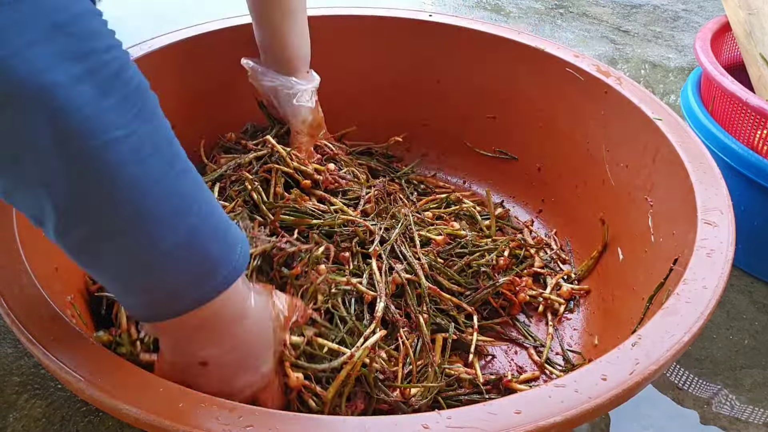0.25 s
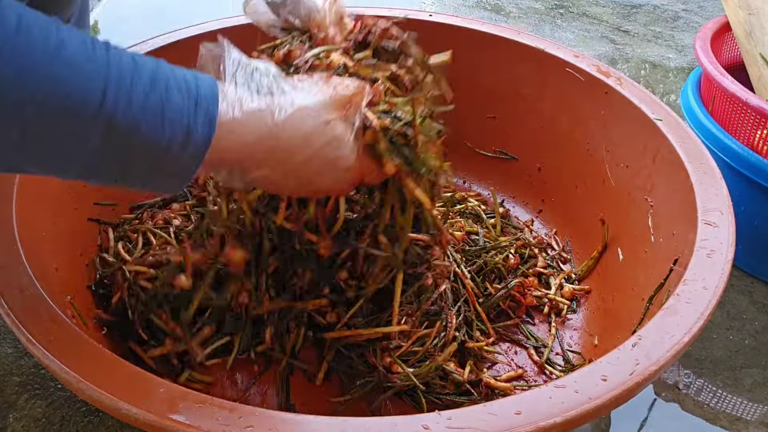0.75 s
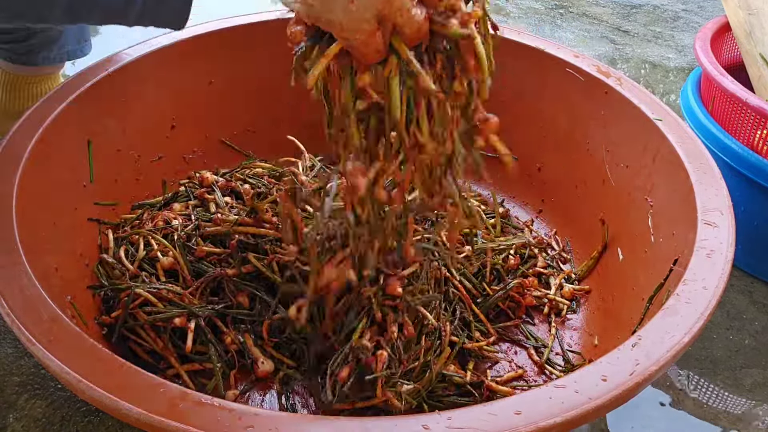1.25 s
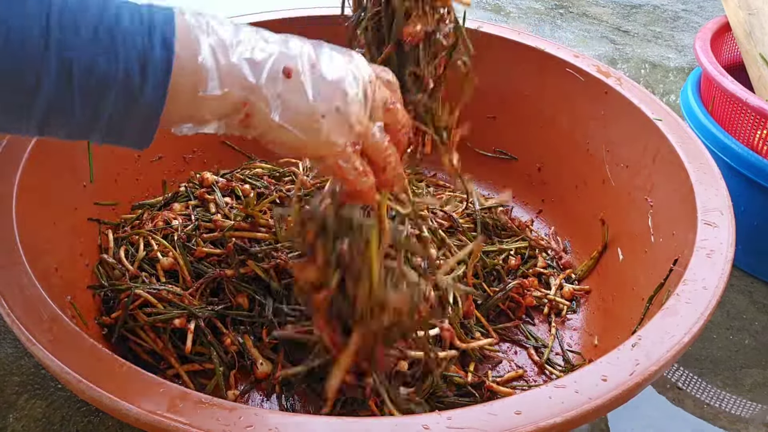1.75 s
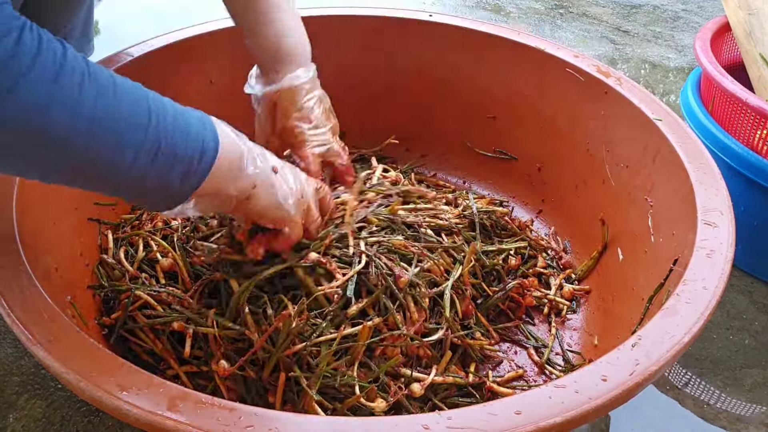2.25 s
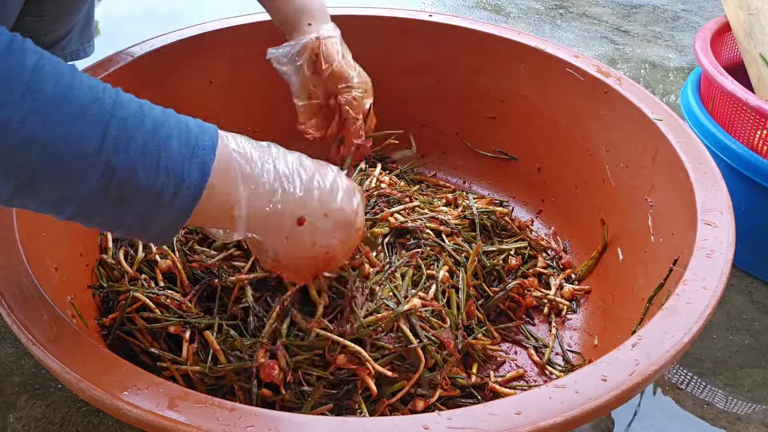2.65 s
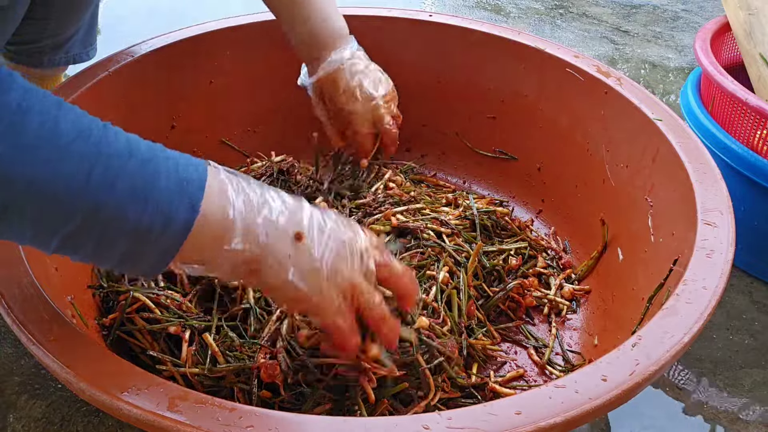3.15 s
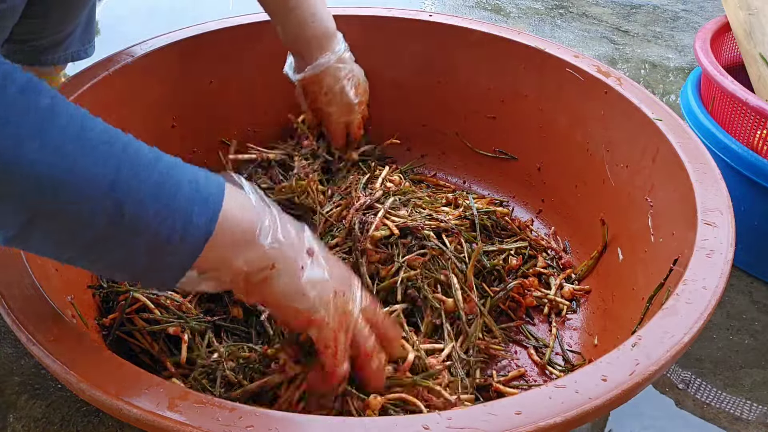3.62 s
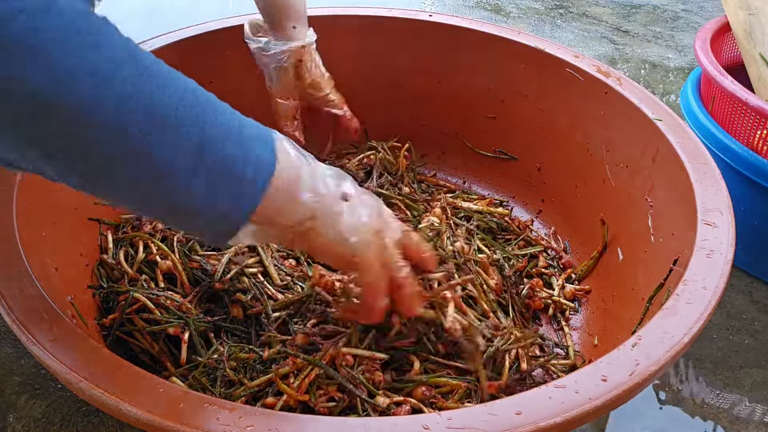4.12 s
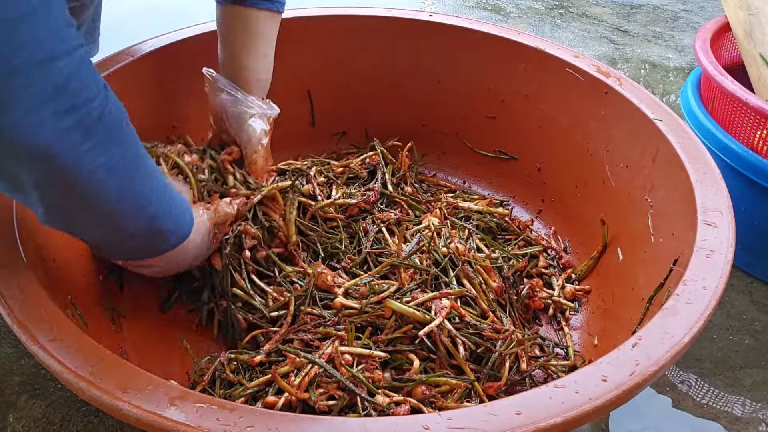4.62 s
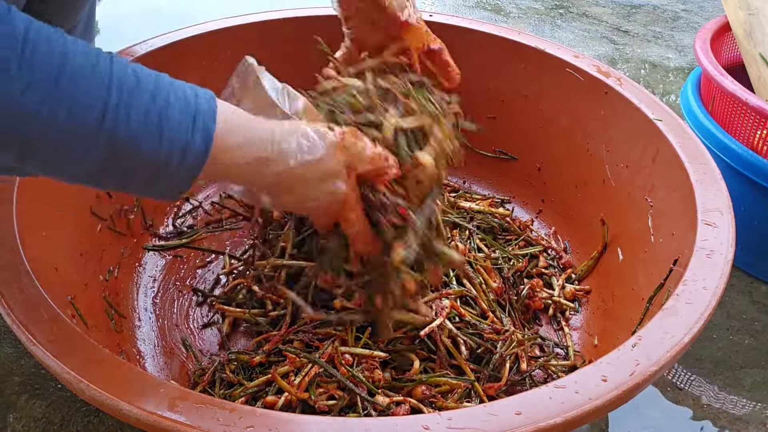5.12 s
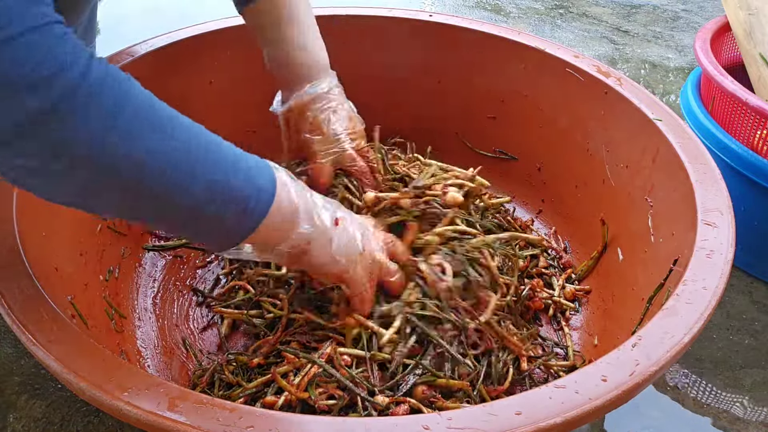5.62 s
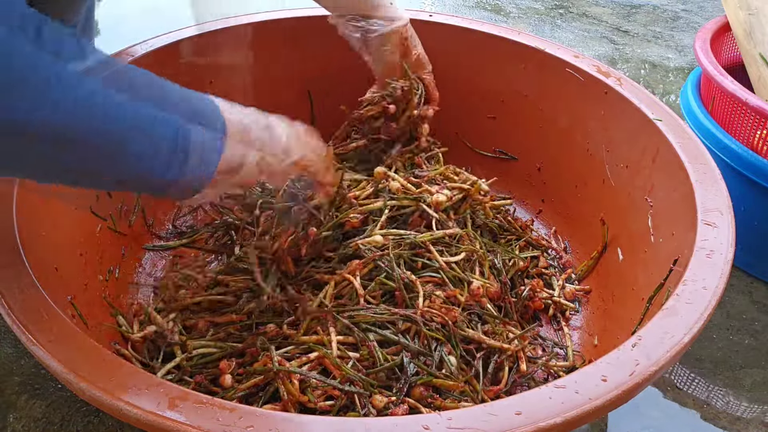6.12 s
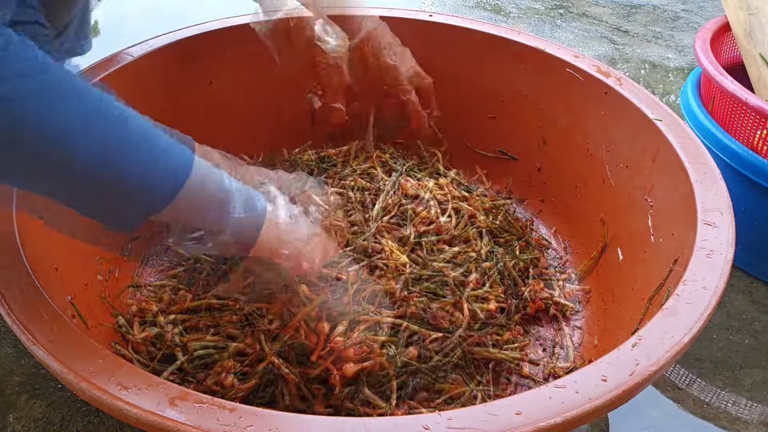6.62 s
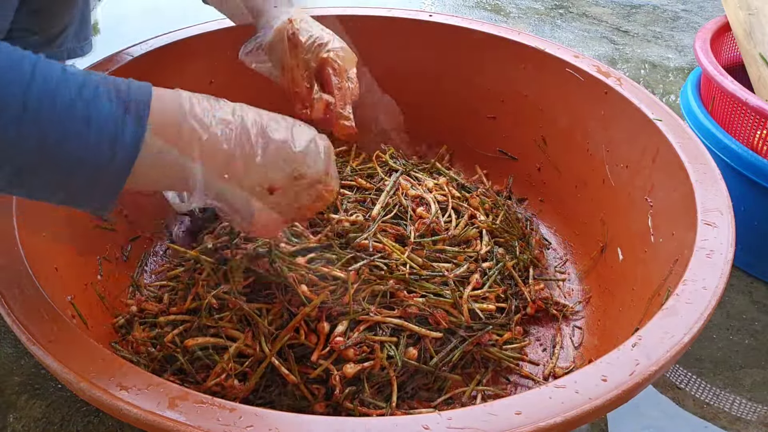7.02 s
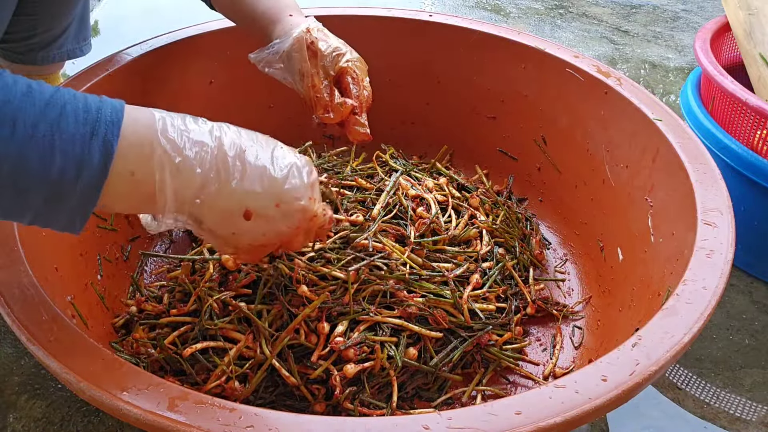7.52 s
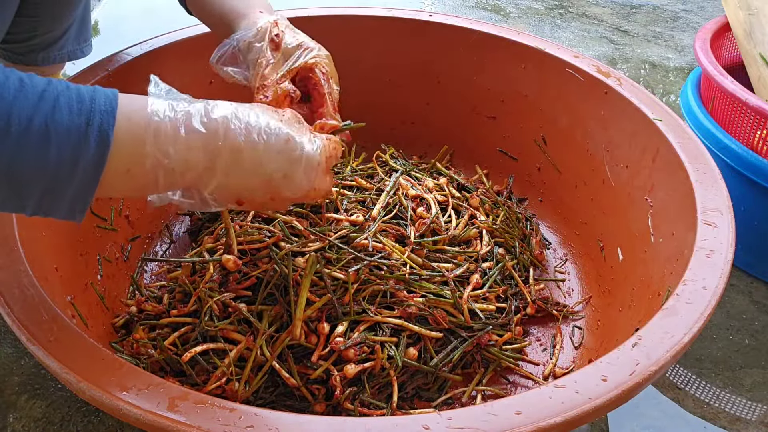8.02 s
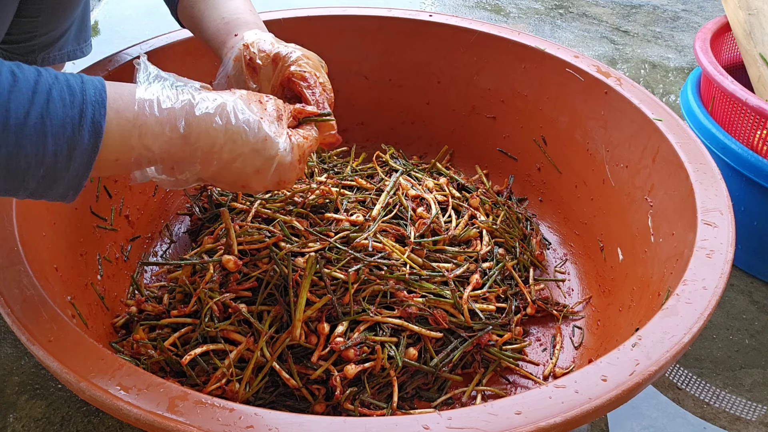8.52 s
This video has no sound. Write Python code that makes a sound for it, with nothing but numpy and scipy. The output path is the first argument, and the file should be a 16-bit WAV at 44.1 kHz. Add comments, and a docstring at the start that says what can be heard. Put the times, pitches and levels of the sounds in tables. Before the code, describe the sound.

Wet seasoned stems are tossed by gloved hands in a plastic basin, squelching and crackling, with hollow knocks while a swallow twitters nearby.

```python
"""Tossing wet stems in a yard

Close by, hands in thin plastic gloves toss wet seasoned stems: squelch and film crackle are pops over noise.
Stick-slip noise drags on a big plastic basin, which booms under heaves and knocks on the ground by its modes.
A swallow twitters nearby in gliding sines and rasping pulses, with a slap from a wall; a dove coos far off.
Behind them lie a low outdoor rumble and a faint hiss, both of shaped noise."""
import sys
import numpy as np
from scipy import signal
from scipy.fft import rfft, irfft, next_fast_len
from scipy.io import wavfile
from scipy.ndimage import map_coordinates

SR = 44100
rng = np.random.default_rng(int(sys.argv[2]) if len(sys.argv) > 2 else 0)


def waveform_to_disk(signal):
    """Save audio, clipped to [-1, 1], as 16-bit WAV at the path in sys.argv[1]."""
    frames = np.transpose(np.atleast_2d(signal))
    scaled = np.clip(frames, -1, 1) * 32767
    samples = np.round(scaled).astype(np.int16)
    wavfile.write(sys.argv[1], SR, samples)


N = 386316

TOP_HZ = 15900  # band limit of the microphones
# the swallow's rasps: t/s, upsweep level/dB, level/dB of the rattle before it
RASPS = [(0.385, -50, -53), (2.184, -53, -52), (4.366, -54, -59), (6.175, -64, -61.5), (6.795, -53, -56),
         (8.336, -50, -57)]


def amp(db):
    """Decibels to gain."""
    return 10 ** (np.asarray(db) / 20)


def unit(x):
    """x at rms 1."""
    return x / np.sqrt(np.mean(x ** 2) + 1e-20)


def crest(x):
    """x at peak 1."""
    return x / (np.abs(x).max() + 1e-20)


def along(points, hz):
    """(f/Hz, value) points read on a log frequency axis."""
    f, v = np.transpose(points)
    return np.interp(np.log(hz + 1), np.log(f + 1), v)


def curves(rows):
    """One value per sample for each column after the time."""
    s, *cols = np.transpose(rows)
    return [np.interp(np.arange(N) / SR, s, c) for c in cols]


def wobble(rate, size=N):
    """A smooth random curve, rate knots a second."""
    knots = rng.standard_normal(int(size * rate / SR) + 4)
    return map_coordinates(knots, [np.arange(size) * rate / SR])


def filtered(x, response):
    """x times a response of frequency."""
    m = next_fast_len(x.shape[-1] + SR // 4)
    spectrum = rfft(x, m) * response(np.fft.rfftfreq(m, 1 / SR))
    return irfft(spectrum, m)[..., :x.shape[-1]]


def coloured(x, spectrum):
    """x given a (f/Hz, level/dB) spectrum, at rms 1."""
    return unit(filtered(x, lambda hz: amp(along(spectrum, hz))))


def band(x, lo_hz, hi_hz):
    """A causal band-pass."""
    edges = [lo_hz, np.clip(hi_hz, lo_hz + 1, SR / 2 - 1)]
    return signal.sosfilt(signal.butter(2, edges, "band", fs=SR, output="sos"), x)


def add(track, s, sound):
    """Mix a sound into a track from time s on."""
    start = round(s * SR)
    part = sound[..., max(-start, 0):N - start]
    track[..., max(start, 0):][..., :part.shape[-1]] += part


def diffuse():
    """Stereo white noise, alike at the two microphones in the bass and unrelated at the top."""
    # left-right likeness of diffuse sound: f/Hz, likeness (0-1)
    likeness = [(60, 0.98), (250, 0.77), (900, 0.3), (2000, 0.5), (12000, 0)]

    def mid_side(hz):
        turn = np.arccos(np.clip(along(likeness, hz), -1, 1)) / 2
        return np.array([np.cos(turn), np.sin(turn)])

    mid, side = filtered(rng.standard_normal((2, N)), mid_side)
    return np.array([mid + side, mid - side])


def grains(rate, centre_hz, cycles, spread_db):
    """Tiny damped pops, rate a second, of random pitch and size, each from its own place in the basin."""
    when, pitch, size, side, lead = rng.random((int(rate * N / SR), 5)).T[:, :, None]
    hz = np.minimum(centre_hz * 2 ** (3 * (pitch - .5)), TOP_HZ)
    gain = hz / centre_hz * amp(spread_db * np.minimum(-np.log(1 - size), 3.5))
    turns = (hz * np.arange(64) / SR).astype(np.float32)
    pops = np.sin(2 * np.pi * turns) * np.exp(-turns / cycles)
    ears = []
    for sign in (1, -1):
        # place is a few samples of delay and some dB between the sides
        at = np.abs(when * N + sign * 9 * (lead - .5)).astype(int) + np.arange(turns.shape[1])
        placed = pops * (gain * amp(sign * 7.9 * (side - .5)))
        ears.append(np.bincount(at.ravel(), placed.ravel(), N)[:N])
    return unit(np.array(ears))


def yard(x):
    """The diffuse answer of walls and ground: decaying noise, different at each microphone."""
    # the yard's echo: f/Hz, t60/s
    echo_t60 = [(200, 0.35), (1000, 0.19), (5000, 0.23), (14000, 0.071)]
    hz, t, z = signal.stft(rng.standard_normal((2, SR // 2)), SR, nperseg=256)
    decay = amp(-60 * t / along(echo_t60, hz)[:, None])
    tail = signal.istft(z * decay, SR, nperseg=256)[1]
    return signal.fftconvolve(np.atleast_2d(x), tail / np.linalg.norm(tail[0]), axes=1)[:, :N]


def outdoors():
    """Low, slowly swaying distant rumble under a faint even hiss, both from one diffuse noise."""
    # distant rumble: t/s, level/dB
    rumble_level = [(0.0, -51), (3.0, -52.5), (7.3, -50.8), (7.5, -54)]
    # spectrum of the rumble: f/Hz, level/dB per Hz
    low_spectrum = [(20, -18), (35, -10), (50, -8.5), (65, 2.5), (85, -1), (115, -3.5), (145, -5),
                    (175, -11), (220, -11), (280, -21), (380, -23.5), (470, -26.5), (540, -43), (900, -53)]
    # spectrum of the hiss: f/Hz, level/dB per Hz
    air_spectrum = [(290, -34), (500, -7), (760, 10), (1160, -9), (1350, -6), (2710, -12.5), (3670, 0.5),
                    (7450, -4), (9950, -10), (11700, -8), (15800, -14)]
    rumble_db, = curves(rumble_level)
    noise = diffuse()
    rumble = amp(rumble_db + 1.5 * wobble(7)) * coloured(noise, low_spectrum)
    return rumble + amp(-74.5) * coloured(noise, air_spectrum)


def dove():
    """Far-off coos: sines that sag and sway in pitch, with the yard's echo."""
    # coos: t/s, length/s, f/Hz, level/dB before a small lift
    coos = [(0.519, 0.32, 417, -70), (1.021, 0.47, 397, -66.5), (1.84, 0.26, 398, -65.5),
            (2.185, 0.26, 398, -67), (2.9, 0.3, 408, -67), (3.329, 0.48, 393, -63),
            (4.205, 0.15, 396, -62.5), (5.227, .3, 421, -67.5), (5.729, 0.52, 385.7, -63.5),
            (6.552, 0.247, 390.5, -64.5), (6.902, 0.16, 387.7, -69)]
    out = np.zeros(N)
    sway = wobble(22)
    for s, length, hz, db in coos:
        u = np.linspace(0, 1, int(length * SR))
        pitch = hz * (1 - 0.023 * (u - .5) + 0.0075 * sway[int(s * SR):][:len(u)])
        swell = np.sqrt(np.abs(np.sin(np.pi * u)))
        add(out, s, amp(db + 1.5) * swell * np.sin(2 * np.pi * np.cumsum(pitch) / SR))
    return out + amp(-12.5) * yard(out)


def syllable(shape, waver):
    """Phase and loudness of one syllable; each has its own pitch and flutter."""
    s, hz, db = np.transpose(shape)
    t = np.arange(s[0], s[-1], 1 / SR)
    trill = wobble(710, size=SR // 4)[:len(t)]
    flutter = wobble(157, size=SR // 4)[:len(t)]
    pitch = np.interp(t, s, hz) * (1 + rng.normal(0, .012) + waver * trill)
    return 2 * np.pi * np.cumsum(pitch) / SR, amp(np.interp(t, s, db) + 2.3 * flutter)


def whistles(calls, shape, waver):
    """One whistled syllable, a gliding sine, at each call."""
    out = np.zeros(N)
    for s, db, *_ in calls:
        phase, loud = syllable(shape, waver)
        add(out, s + shape[0][0], amp(db) * loud * np.sin(phase))
    return out


def rattles():
    """Before each upsweep the swallow rasps: quickening pulses with two bright groups of overtones."""
    # one rattle: t/s from the call, pulse rate f/Hz, relative level/dB
    rattle_shape = [(-.125, 510, -26), (-.085, 568, -0.5), (-.045, 639.4, 3.5), (-.02, 672, -10),
                    (.005, 719, -4)]
    # overtones of the rasp: multiple of the pulse rate, level/dB
    overtones = [(4, -16), (6, -6), (7.5, -14), (9, -6.5), (10, -0.5), (11, -5.5), (13, -11), (18, -13),
                 (22, -20)]
    out = np.zeros(N)
    k = np.arange(4, 23)[:, None]
    gain = amp(np.interp(k, *np.transpose(overtones)))
    for s, _, db in RASPS:
        phase, loud = syllable(rattle_shape, waver=0.007)
        pulses = (gain * np.cos(k * phase + rng.uniform(0, 2 * np.pi, k.shape))).sum(0)
        add(out, s + rattle_shape[0][0], amp(db) * loud * pulses)
    return out


def swallow():
    """Falling chips, thin buzzy notes, peeps and rising rasps, with a slap from a near wall."""
    # calls of each kind: t/s, level/dB
    chip_calls = [(0.0821, -45.5), (1.3104, -47), (4.934, -46), (6.4158, -47.5), (6.6382, -47)]
    tsee_calls = [(6.0314, -45), (6.6019, -45.5), (7.1564, -46), (7.777, -45), (8.406, -47)]
    peep_calls = [(7.454, -57), (7.5244, -59)]
    # syllable shapes: t/s from the call, f/Hz, relative level/dB
    lead_in = [(-.11, 4500, -24), (-.078, 4380, -2), (-.052, 4780, -24), (-.045, 4700, -40)]
    chip = [(-.056, 6840, -36), (-.046, 6600, -7), (-.03, 6200, -11), (-.016, 6180, -10),
            (-.005, 4960, -14), (0, 4640, 5), (.012, 3700, -3), (.022, 2800, -1.5), (0.03, 2530, -8)]
    tsee = [(-.04, 9290, -12), (-.012, 10180, -7), (-.005, 8570, -2), (0, 8000, 3), (.009, 7680, -4),
            (0.02, 8140, -4.5), (.08, 8180, -5), (.105, 8040, -13), (.125, 7700, -33)]
    peep = [(-.012, 7200, -25), (.003, 6720, 7), (.025, 6650, -6), (.05, 6360, -22)]
    upsweep = [(-.05, 3390, -27), (-.022, 4206, -5), (0, 5670, 1), (0.014, 6360, 4.5), (.024, 6660, -32)]
    song = whistles(chip_calls, lead_in, waver=0.01) + whistles(chip_calls, chip, waver=0.015)
    song += whistles(tsee_calls, tsee, waver=0.0293) + whistles(peep_calls, peep, waver=0.039)
    song += whistles(RASPS, upsweep, waver=0.01) + rattles()

    def paths(hz):
        # arrival times at left and right, s
        direct = np.exp(-2j * np.pi * hz * np.array([[0], [.00003]]))
        slap = 0.48 * np.exp(-2j * np.pi * hz * np.array([[.0118], [.0124]]))
        return direct + slap

    return filtered(song, paths) * amp(-4.0) + amp(-2.5) * yard(song)


def knocks():
    """The basin rocks: its wall gives with a short hollow clack, then damped modes ring on faintly."""
    # blows on the basin: t/s, level/dB, thud and clack level/dB relative to it, contact brightness f/Hz
    blows = [(0.116, -33, -8, -10, 1400), (0.148, -18, -18.5, -5.5, 1260), (0.211, -40.5, -16, -1.5, 1410),
             (0.325, -42, -5, -5, 1400), (0.411, -40, -17, -16, 1110), (1.778, -41.5, 3.5, -14, 850),
             (2.037, -60.5, 14.5, -16, 910), (3.624, -14.5, -20.5, -12, 1570),
             (3.651, -6.5, -24.5, -22, 2400), (4.46, -24.5, -8.5, -10, 1980), (4.508, -40, 3, 6, 2600),
             (4.552, -38, -19, -5, 2400), (4.701, -42.5, -5, -3, 1600), (4.768, -43, -6.5, -23, 1400),
             (5.065, -48.5, 2.5, -18, 1010), (5.12, -46, -21, -12, 1210), (5.373, -37, -4, -16, 860),
             (6.01, -33.5, -3, -9, 1700), (6.037, -28, -1, -9, 1800), (6.146, -34, -7, -3, 2180)]
    # the broad, quickly damped give of the wall: f/Hz, width/Hz, level/dB
    wall_give = [(237.3, 45, -14), (339, 67, -26), (440, 24, -12.5), (664, 117, 2.5), (930, 173, 2),
                 (1152, 187, -2.5), (1310, 100, -3), (1913, 270, -18), (2827, 990, -30)]
    # the basin's ring: f/Hz, level/dB, t60/s
    ring_modes = [(390.5, -20.5, 0.2), (473, -17, 0.15), (707, 1.5, 0.12), (793, -6, 0.1),
                  (900, -4.5, 0.085), (993, -8, .08), (1040, -8.5, 0.11), (1223, -3, 0.1),
                  (1290, -14.5, .08), (2070, -19, 0.09)]
    out, t = np.zeros((2, N)), np.arange(SR // 4) / SR
    wall_hz, width, wall_db = np.transpose(wall_give)[:, :, None]
    ring_hz, ring_db, t60 = np.transpose(ring_modes)[:, :, None]
    polarity = (-1) ** np.arange(len(wall_give))[:, None]
    wall = polarity * width * np.exp(-np.pi * width * t) * np.sin(2 * np.pi * wall_hz * t)
    modes = np.exp((2j * np.pi * ring_hz - np.log(1000) / t60) * t) * (1 - np.exp(-t / 0.0012))
    for s, db, thud_db, clack_db, bright_hz in blows:
        give = (wall * amp(wall_db + rng.normal(0, 0.81, wall_db.shape))).sum(0)
        phase = rng.uniform(0, 2 * np.pi, len(modes)) + rng.normal(0, 0.39, (2, len(modes)))
        ring = (np.exp(1j * phase) @ (modes * amp(ring_db + rng.normal(0, 2, ring_db.shape)))).real
        # the base chatters on the ground just after the blow; a hard blow seats it more cleanly
        contact = rng.standard_normal(len(t)) + .6 * rng.standard_normal((2, len(t)))
        contact = contact * np.exp(-t / 0.014)
        chatter = signal.fftconvolve(contact, give[None], axes=1)[:, :len(t)]
        blow = crest(give) + amp(-9.5) * crest(ring) + amp(-10.5 - 0.18 * db) * crest(chatter)
        # a narrow range round 530 Hz in which the wall hardly moves
        blow = signal.lfilter(*signal.iirnotch(530, 5, SR), blow)
        body = crest(band(blow, 520, bright_hz))
        thud = amp(thud_db) * crest(band(band(blow, 130, 433), 130, 433))
        clack = amp(clack_db) * crest(band(blow, 1270, max(bright_hz, 1450)))
        add(out, s - .001, amp(db) * (body + thud + clack))
    return out


def snaps():
    """A stem breaks or a glove fold flips: a noise crack of a few milliseconds and a brief patter."""
    # single snaps: t/s, peak level/dB before a small lift, f/Hz
    cracks = [(0.2653, -36, 3010), (0.2967, -32, 4150), (0.5731, -39.5, 6960), (1.418, -34.5, 3050),
              (1.666, -38, 2000), (2.2719, -39.5, 11700), (2.3745, -35, 4900), (2.5392, -33, 3150),
              (2.819, -34.5, 6150), (2.9001, -37, 4960), (3.199, -41.5, 7455), (3.2343, -35, 5160),
              (4.5092, -30.5, 3010),  (5.067, -33, 12000), (5.3522, -37.5, 6120), (6.478, -40, 6150),
              (6.7408, -36.5, 4180), (8.0423, -41.5, 3690), (8.1743, -41, 8100)]
    out, t = np.zeros((2, N)), np.arange(SR // 20) / SR
    for s, db, hz in cracks:
        decay = np.exp(-t / 0.0027) + .16 * np.exp(-t / 0.0094)
        crack = rng.standard_normal((2, len(t))) * decay
        pitched = band(crack, hz / 1.5, hz * 2)
        add(out, s, amp(db + 0.5) * crest(pitched + 0.59 * band(crack, 2900, 15000)))
    return out


def drag(pressure):
    """Stems stick and slip on the plastic; a heave of the whole heap makes the basin boom."""
    # heaves of the whole heap against the wall: t/s, length/s, level/dB
    heaves = [(0.322, 0.11, -41), (4.498, 0.089, -36), (6, 0.19, -46)]
    # spectrum of the rubbing: f/Hz, level/dB per Hz
    rub_spectrum = [(260, -29.5), (420, -10), (470, 1.5), (539, -8.5), (701, -2), (840, -6.5), (911, -6.5),
                    (982, -9.5), (1270, -11), (1500, -10), (1950, -30), (3300, -120)]
    # spectrum of the basin's low, hollow boom: f/Hz, level/dB per Hz
    boom_spectrum = [(60, -2), (120, -2), (230, 3), (300, -4), (400, -12.5), (470, -9), (560, -13),
                     (1000, -40.5)]
    slips = diffuse() * amp(2.0 * wobble(70))
    push = np.zeros(N)
    for s, length, db in heaves:
        u = np.arange(SR // 2) / SR / length
        add(push, s, amp(db) * (1 - np.exp(-u * 12)) * np.exp(-2 * u))
    return pressure * coloured(slips, rub_spectrum) + push * coloured(slips, boom_spectrum)


def stems(squeeze, crinkle):
    """Wet stems part in clumps of small pops over a swish; sauce and glove film add a finer crackle."""
    # spectrum of the wet stems: f/Hz, level/dB per Hz
    squelch_spectrum = [(530, -35.5), (900, -5), (1140, -22.5), (1260, -6), (1450, -0.5), (1890, -4),
                        (2080, -2.5), (2810, -2.5), (3170, 0), (5060, -4), (9780, -10.5), (11600, -9.5),
                        (15800, -20)]
    # spectrum of the glove film: f/Hz, level/dB per Hz
    film_spectrum = [(2350, -36.5), (4000, -3.5), (6950, -4), (7360, -1.5), (10100, -9), (11500, -1.5),
                     (12400, -6), (15200, -5.5), (15800, -25)]
    clumps = wobble(45) + wobble(130) + .4 * wobble(14)
    squelch = grains(rate=1800, centre_hz=3830, cycles=2.1, spread_db=3.5) + 1.2 * diffuse()
    film = grains(rate=1800, centre_hz=8040, cycles=1.4, spread_db=2.0)
    film = film + 1.1 * rng.standard_normal((2, N))
    squelch = squeeze * amp(0.99 * clumps) * coloured(squelch, squelch_spectrum)
    film = crinkle * amp(1.3 * clumps) * coloured(film, film_spectrum)
    # stems lean to the right, film to the left
    return squelch * amp([[-.5], [.5]]) + film * amp([[.4], [-.4]])


def handling():
    """Loudness of stems, gloves and dragging: strokes build, hold and settle over a soft stirring."""
    # each grab, lift or drop of a handful: t/s, length/s, stems level/dB,
    # glove film level/dB and dragging level/dB, both relative to the stems
    strokes = [(0.017, .22, -54, -2, -1.5), (0.225, .15, -50, -3, -3.5), (0.4, 0.106, -53.5, -9, -4),
               (0.568, .25, -58.5, -10, -5), (0.8, 0.22, -60.5, -6, -12), (1.023, 0.143, -58.5, -3, -6),
               (1.267, .14, -64, 0, -2.5), (1.42, .12, -54.5, -4, -12), (1.617, 0.067, -52.5, -2.5, -6.5),
               (1.866, 0.32, -59.5, -2, -5.5), (2.248, 0.23, -51.5, -3.5, -9),
               (2.877, 0.19, -55.5, -1.5, -9), (3.15, 0.2, -66.5, 5, -22), (3.38, .22, -51.5, -4, -8.5),
               (3.92, 0.11, -51, -3.5, -7), (4.21, 0.24, -57.5, -8, -4), (4.422, 0.15, -48.5, -14, 1),
               (4.545, .23, -54, -11, 1.5), (4.92, 0.12, -58.5, -7, -7), (5.136, 0.2, -72.5, -3, 4),
               (5.551, .68, -54, -0.5, -3), (6.274, .32, -56.5, 0.5, -9), (6.615, .17, -55, -2.5, -11),
               (6.896, 0.22, -56, 0, -6.5), (7.058, 0.118, -52.5, -5.5, -7), (7.266, 0.068, -53.5, 0, -11),
               (7.538, .21, -62.5, -4.5, -8), (7.79, .065, -70, 15.5, -9.5), (8.02, 0.046, -59.5, 1, -9),
               (8.203, .28, -57.5, -1.5, -22), (8.599, 0.065, -58.5, 0, -10.5)]
    # the hands lift and the level dips briefly: t/s, half-length/s, level/dB
    pauses = [(2.74, 0.052, -3), (3.8, 0.049, -3), (5.492, .07, -2), (7.98, 0.048, -3)]
    grip_s, settle_s = .071, 0.079  # the fingers close; the stems settle
    t = np.arange(N) / SR
    # the stirring between strokes drops to a mere picking near the end
    stir = amp(np.interp(t, [7.42, 7.42 + 0.25], [-61.5, -70.5]))
    # rows: stems, film, dragging
    power = (amp([[0], [-0.5], [-7]]) * stir) ** 2
    u = t[:2 * SR]
    for s, length, db, film_db, drag_db in strokes:
        stroke = np.minimum(u / grip_s, 1) * np.exp(-np.maximum(u - length, 0) / settle_s)
        add(power, s, (amp(db) * amp([[0], [film_db], [drag_db]]) * stroke) ** 2)
    lull_db = sum(db * np.exp(-((t - s) / half) ** 2) for s, half, db in pauses)
    return np.sqrt(power) * amp(lull_db)


def scene():
    """The work at the basin, the birds and the yard around them."""
    squeeze, crinkle, pressure = handling()
    contacts = knocks() + snaps()
    basin = stems(squeeze, crinkle) + drag(pressure) + contacts + amp(-10.0) * yard(contacts)
    return basin + swallow() + dove() + outdoors()


def record(dry):
    """The left microphone is set louder, the right softer; nothing is kept above the band limit."""
    return filtered(dry * amp([[1.4], [-1.5]]), lambda hz: hz < TOP_HZ)


dry = scene()
out = record(dry)
waveform_to_disk(out)
```